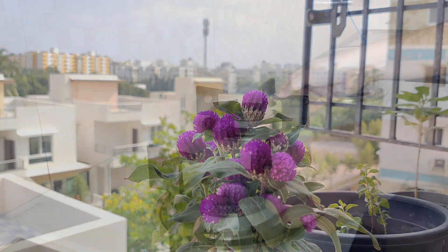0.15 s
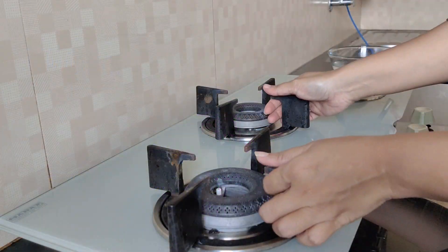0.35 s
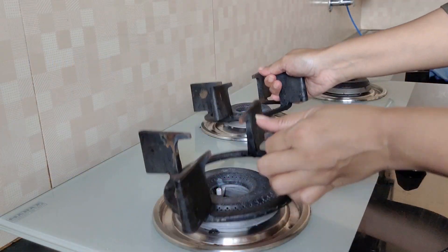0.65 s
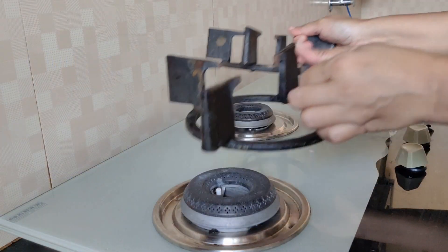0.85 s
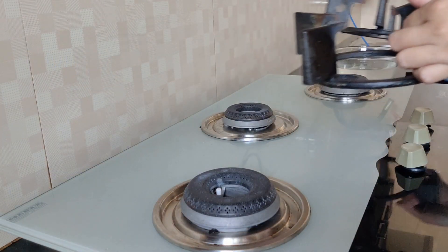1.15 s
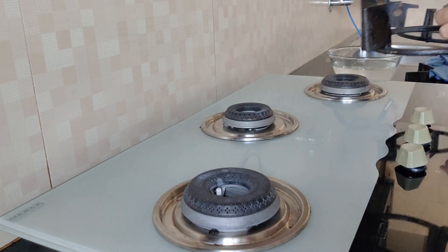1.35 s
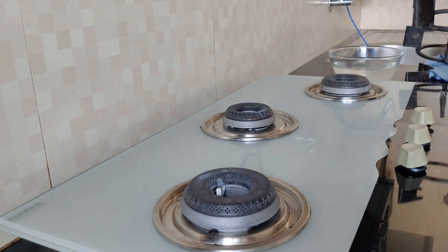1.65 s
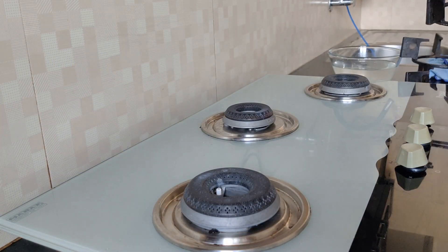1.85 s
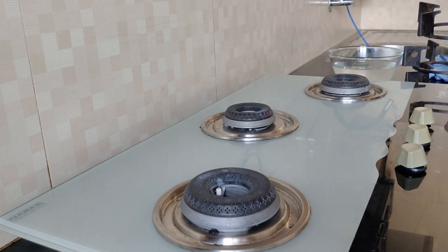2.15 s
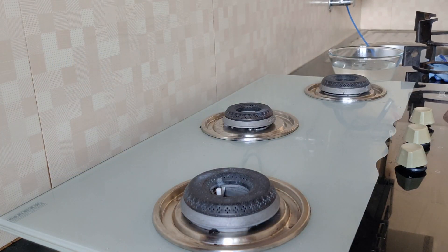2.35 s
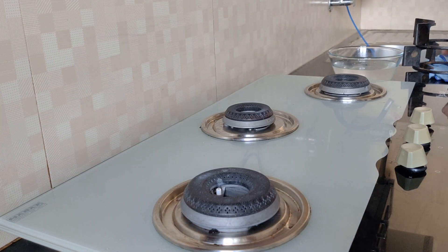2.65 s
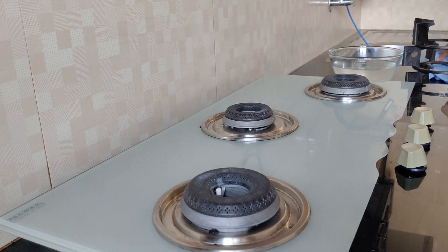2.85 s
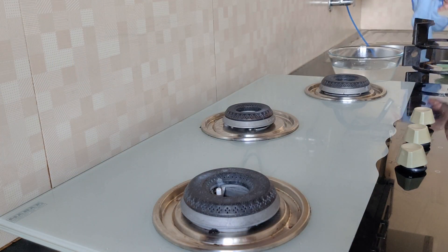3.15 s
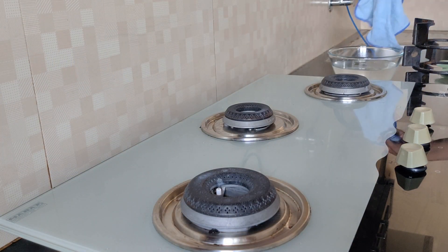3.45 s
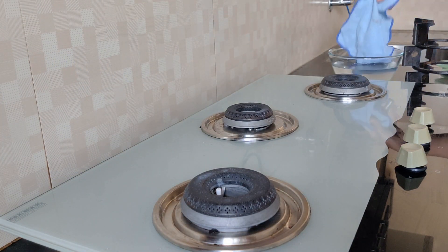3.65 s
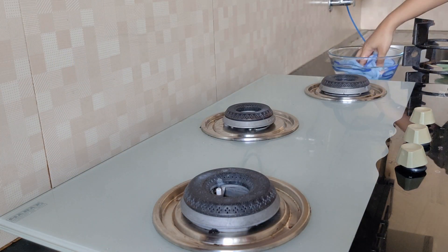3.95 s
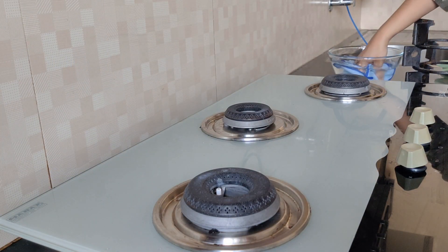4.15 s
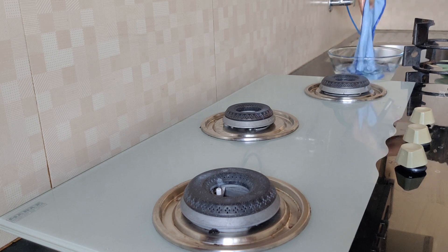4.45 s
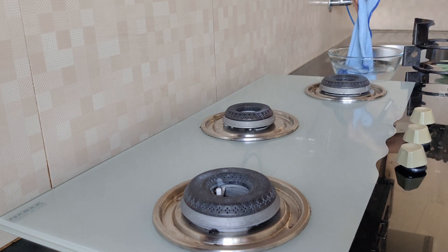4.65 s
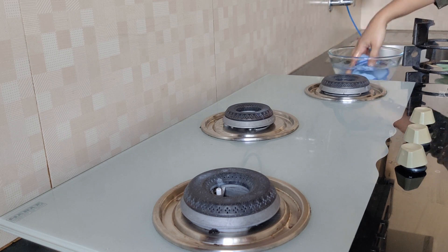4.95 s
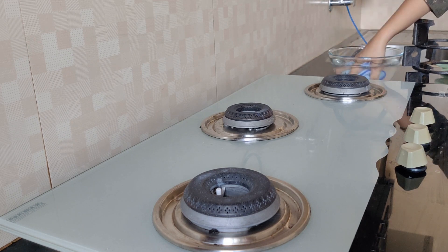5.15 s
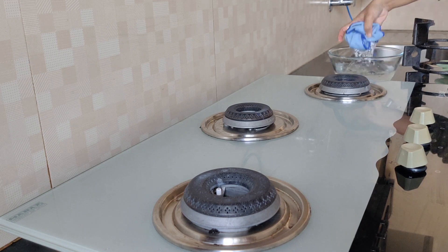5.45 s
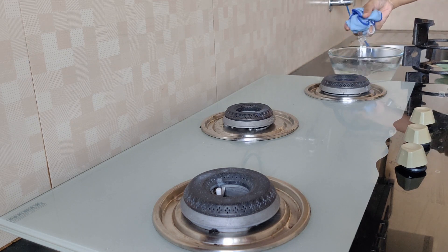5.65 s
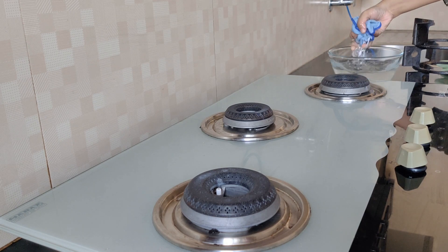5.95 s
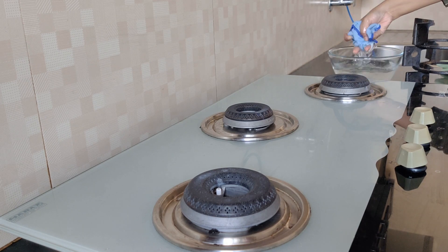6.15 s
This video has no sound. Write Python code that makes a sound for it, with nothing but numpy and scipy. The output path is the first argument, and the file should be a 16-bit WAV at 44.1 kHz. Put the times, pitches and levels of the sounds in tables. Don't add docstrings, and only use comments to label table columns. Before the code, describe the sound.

A kitchen with hard walls, heard in stereo from near the hob. First outdoor rumble, traffic hiss and a faint wavering brake whistle, ending at a dull iron knock. After near silence, two strong metallic clunks with rattle and ring as stands land on the counter. Then tiny clear drops, a soft cloth rustle, wet clicks and dripping, and finally a lively burst of gurgling bubbles and fizzing spray.

```python
import sys
import numpy as np
from scipy import signal
from scipy.fft import rfft, irfft, next_fast_len
from scipy.io import wavfile
from scipy.ndimage import uniform_filter1d, map_coordinates

SR = 44100
rng = np.random.default_rng(int(sys.argv[2]) if len(sys.argv) > 2 else 0)


def generate_wav(signal):
    frames = np.transpose(np.atleast_2d(signal))
    scaled = np.clip(frames, -1, 1) * 32767
    pcm = np.round(scaled).astype(np.int16)
    wavfile.write(sys.argv[1], SR, pcm)


def undo_db(level):
    steps = np.asarray(level, float) / 20
    return 10 ** steps


N = 277830

# t/s, peak level/dB
CONTACTS = [
    (0.781, -21.5),
    (2.267, -16),
    (2.8396, -15),
    (2.478, -31),
]
# f/Hz, correlation
ALIKE = [(42, .15), (70, .82), (130, .85), (290, .75), (640, .45), (1410, -.1), (3100, 0), (6000, .8),
         (15000, .85)]


def unit(x):
    return x / np.sqrt(np.mean(x ** 2) + 1e-20)


def along(points, hz):
    f, value = np.transpose(points)
    return np.interp(np.log(hz + 1), np.log(f + 1), value)


def curves(rows):
    s, *columns = np.transpose(rows)
    t = np.arange(N) / SR
    return [undo_db(np.interp(t, s, db, left=-200, right=-200)) for db in columns]


def wobble(rate):
    knots = rng.standard_normal(int(N * rate / SR) + 4)
    return map_coordinates(knots, [np.arange(N) * rate / SR])


def filtered(x, response):
    m = next_fast_len(x.shape[-1] + 8192)
    spectrum = rfft(x, m) * response(np.fft.rfftfreq(m, 1 / SR))
    return irfft(spectrum, m)[..., :x.shape[-1]]


def modes(peaks, skirt=1):
    def one(f, centre, width):
        damping = 1j * f * width
        return (damping / (centre * centre - f * f + damping)) ** skirt

    return lambda f: sum((-1) ** k * undo_db(db) * one(f, centre, width + 1)
                         for k, (centre, width, db) in enumerate(peaks))


def ports(pair, response, alike, lag=0):
    def mixing(hz):
        angle = np.arccos(np.clip(along(alike, hz), -1, 1)) / 2
        return response(hz) * [np.cos(angle), np.sin(angle)]

    mid, side = filtered(pair, mixing)
    return unit(np.array([np.roll(mid + side, lag), mid - side]))


def rush(spectrum, lumps_db, rate):
    pair = rng.standard_normal((2, N)) * undo_db(lumps_db * wobble(rate))
    return ports(pair, lambda hz: undo_db(along(spectrum, hz)), ALIKE)


def add(out, s, db, grain, t60, wet_db, alike, lag=5):
    t = np.arange(int(SR * np.clip(1.2 * t60, .05, .33))) / SR
    a, b = rng.standard_normal((2, len(t)))
    angle = np.arccos(np.clip(alike, -1, 1)) / 2
    tail = np.array([np.cos(angle) * a + np.sin(angle) * b, np.cos(angle) * a - np.sin(angle) * b])
    flutter_db = 1.42 * np.interp(t, np.arange(60) * 0.0056, rng.standard_normal(60))
    fall_db = 60 * (t / max(t60, .03)) ** 1.223
    tail *= undo_db(wet_db + flutter_db - fall_db) * np.clip(t / .004, 0, 1)
    tail[:, 0] = 1
    tail[0] = np.roll(tail[0], lag)
    heard = signal.fftconvolve(grain[None] / np.abs(grain).max(), tail, axes=1)
    i = round(s * SR)
    out[:, i:i + heard.shape[1]] += undo_db(db) * heard[:, :out.shape[1] - i]


def rocking(touches, t):
    # rise/s, fall while rocking/(dB/s), fall at rest/(dB/s)
    attack_s = np.array((0.013, 0.0023, 0.0067))[:, None]
    sag = np.array((33.5, 102.5, 157))[:, None]
    release = np.array((183, 193, 248.5))[:, None]
    crack_db = np.array((2, 2.5, 12))[:, None]
    crack_s = 0.024
    power = 0
    for s, *levels_db, hold in touches:
        age = np.clip(t - s, 0, None)
        fall_db = sag * np.minimum(age, hold) + release * np.clip(age - hold, 0, None)
        fall_db = fall_db - crack_db * np.exp(-age / crack_s)
        gain = undo_db(np.array(levels_db)[:, None] - fall_db) * np.clip(age / attack_s, 0, 1)
        power = power + gain ** 2
    return np.sqrt(power)


def stands():
    # t/s, thud/dB, clatter/dB, rattle/dB, rocking/s
    knocks = [
        [(0.748, -25.5, -43.5, -68, 0.011), (0.78, -26, -31.5, -47.5, 0.064)],
        [(1.802, -47, -47.5, -70.5, .04)],
        [(2.246, -49, -57, -55, .02), (2.267, -27.5, -28.5, -41, 0.14), (2.305, -32.5, -32, -37.5, 0.15),
         (2.477, -39.5, -44, -61, 0.024)],
        [(2.82, -45, -58, -65.5, .02), (2.84, -25.5, -27.5, -35, 0.18), (3.11, -54, -76, -87, 0.12)],
        [(4.21, -51.5, -56.5, -72, 0.072)],
    ]
    # f/Hz, width/Hz, level/dB
    thuds = [
        [(94.4, 9.2, -2), (167, 24, 2), (278.7, 30, -5.5), (361, 21, -11.5)],
        [(94, 12, -30), (283, 27, 1.5), (362, 43, -6)],
        [(101.4, 31, -1), (135.7, 24, -2), (162.4, 17, -8), (277.5, 34, -1), (355, 5.8, -2.5)],
        [(110.3, 39.5, 5.5), (148.8, 11, 0), (243, 63, -11.5), (287.3, 16, 5), (324, 22, -11)],
        [(98, 26, -13), (296, 390, 9)],
    ]
    # f/Hz, width/Hz, level/dB
    clatters = [
        [(481, 14, 10), (569, 120, 4), (732, 108, 2), (943, 19, -7.5), (1636, 97, -15)],
        [(560, 18, -4.5), (790, 43, -9), (914, 33, -6), (1070, 15, -19), (1710, 130, -18.5)],
        [(569, 24, -1), (655, 28, 4), (893, 77, -4.5), (1040, 6.2, -4.5), (1156, 91, -8.5), (1289, 29, -2.5),
         (1580, 25, -11)],
        [(520, 205, 0), (590, 48, -13), (662, 54, 7), (797, 21, 1.5), (905, 156, -1), (1166, 10, -3.5),
         (1640, 49, -9)],
        [(903, 200, -8), (1860, 70, -15)],
    ]
    # f/Hz, width/Hz, level/dB
    rattles = [
        [(2180, 950, 7), (2860, 730, -2.5), (4260, 790, -7), (6400, 2700, -13.5), (9800, 1800, -24),
         (12600, 3800, -22.5)],
        [(2220, 160, 0)],
        [(2020, 1370, 2), (3050, 2200, -5), (6700, 410, -18), (12000, 4300, -28.5)],
        [(2132, 74, 6.5), (3330, 800, -15.5), (6800, 2000, -27)],
        [(2120, 180, 0)],
    ]
    knock_pan = (0.5, -3.5, 0.2, 0.3, -1.5)
    # f/Hz, correlation
    knock_alike = [(25, .3), (60, .78), (130, .9), (300, .95), (700, .85), (1500, .75), (3000, .75),
                   (8000, .8)]
    # f/Hz, level/dB
    dull_band = [(4100, -0.5), (4700, -10), (5500, -6), (6000, 0.5)]
    # f/Hz, width/Hz, level/dB
    cracks = [
        [(1270, 520, 7), (2750, 680, 7.5), (3830, 910, -6), (4500, 620, -5), (6700, 1500, -8.5),
         (10000, 1300, -25), (13000, 3500, -28)],
        [(1100, 380, 13), (2600, 2100, -7), (4030, 640, -15), (7000, 2300, -28)],
        [(1100, 620, 1.5), (2360, 960, -11), (3880, 410, -19), (7060, 2000, -33)],
        [(700, 370, 4), (1300, 600, -6), (2600, 1000, -18)],
    ]

    out, size = np.zeros((2, N)), SR // 2
    for touches, pan_db, *bodies in zip(knocks, knock_pan, thuds, clatters, rattles):
        i = round(touches[0][0] * SR)
        on_counter = i > SR
        pan = undo_db([[pan_db / 2], [-pan_db / 2]])
        gains = rocking(touches, (i + np.arange(size)) / SR)
        for gain, body, bed_db in zip(gains, bodies, (-12, -9, -30)):
            chatter = rng.standard_normal((2, SR)) * undo_db(1.6 * rng.exponential(size=(2, SR)))
            wide = [(hz, hz * 0.5, bed_db + db) for hz, _, db in body]
            sound = ports(chatter, modes(body + wide, skirt=2.35), knock_alike, lag=8)[:, -size:]
            power = uniform_filter1d(np.mean(sound ** 2, 0), 1800)
            steady = np.sqrt(np.abs(power) + 0.11)
            dulled = filtered(sound, lambda hz: undo_db(along(dull_band, hz) * on_counter))
            out[:, i:i + size] += pan * gain * dulled / steady

    t = np.arange(300) / SR
    for (s, db), colour in zip(CONTACTS, cracks):
        burst = rng.standard_normal(len(t)) * undo_db(-60 * t / 0.011)
        crack = filtered(burst, modes(colour, skirt=2.06))
        add(out, s, db - 3, crack, t60=.17, wet_db=-29, alike=.6, lag=12)
    return out


def iron():
    # t/s, level/dB, weak high modes/dB
    strikes = [
        (0.033, -65, -62),
        (0.781, -45, -42),
        (2.268, -32.5, -35.5),
        (2.358, -29.5, -60),
        (2.84, -43.5, -21),
    ]
    # f/Hz, level/dB, t60/s
    irons = [
        [(4620, 2, .22), (5900, -3, .2), (7700, -4, .3), (9100, 0, .15)],
        [(2492, -7, .3), (2700, 3, .1), (2859, -4, .14), (3661, -8, .2), (4177, -10, .09), (4650, -14, .06),
         (6450, -20, .08), (7800, -24, .1)],
        [(2288, -6, .42), (2525, -8, .4), (2697, 0, .3), (2869, -8, .5), (3128, -7, .4), (3321, -9, .35),
         (3020, -10, .3), (5814, -26, .12), (6169, -19, .36), (7305, -18, .2), (8204, -27, .3), (8952, -23, .1),
         (10700, -48, .5)],
        [(2697, 0, .16), (2699, -8, .48)],
        [(2143, 5, .44), (2129, -1, .46), (2180, -6, .4), (3052, -12, .3), (3321, -12, .36), (2503, -14, .5),
         (2681, -6, .36), (2864, -11, .5), (3666, -16, .3), (3994, -13, .4), (5835, -15, .18), (6121, -15, .25),
         (6934, -14, .3), (7720, -16, .36), (8877, -19, .2), (9539, -18, .16)],
    ]
    out, t = np.zeros((2, N)), np.arange(SR // 2) / SR
    late_s = np.array([[5 / SR], [0]])
    for (s, db, crowd_db), partials in zip(strikes, irons):
        crowd = [(5700 + 4600 * a, crowd_db + 6 * b, 0.049 + 0.35 * c ** 3)
                 for a, b, c in rng.random((26, 3)) if crowd_db > -50]
        for hz, level_db, t60 in partials + crowd:
            knots = np.meshgrid(np.arange(4), t * 58, indexing="ij")
            waver = map_coordinates(rng.standard_normal((4, 30)), knots)
            height = (hz / 5500) ** 2
            tone = np.sin(2 * np.pi * hz * (t - late_s) + (.3 + height) * waver[2:])
            swell_db = db + level_db + (1.5 + 1.1 * height) * waver[:2] - 60 * (t / t60) ** 1.5
            swell = undo_db(swell_db) * (1 - np.exp(-t / .003))
            out[:, round(s * SR):][:, :len(t)] += swell * tone
    return out * undo_db([[1.5], [-1.5]])


def counter():
    # t/s, f/Hz, level/dB, t60/s
    slab_notes = [
        (0.784, 172.1, -35.5, 0.3),
        (0.784, 340, -29.5, 0.13),
        (2.295, 278.4, -27, .25),
        (2.272, 709, -30, 0.15),
        (2.272, 1040, -32.5, 0.1),
        (2.272, 358, -40.5, 0.22),
        (2.845, 286, -30, 0.48),
        (2.845, 602, -42, 0.23),
        (3.106, 147, -47, 0.45),
    ]
    out, t = np.zeros((2, N)), np.arange(SR // 2) / SR
    for s, hz, db, t60 in slab_notes:
        knots = np.meshgrid(np.arange(3), t * 45, indexing="ij")
        waver = map_coordinates(rng.standard_normal((3, 30)), knots)
        swell = undo_db(db + 2.8 * waver[0] - 60 * (t / t60) ** 2) * (1 - np.exp(-t / 0.0047))
        out[:, round(s * SR):][:, :len(t)] += swell * np.sin(2 * np.pi * hz * t + 0.32 * waver[1:])
    return out


def bubble(hz, turns):
    age = np.arange(int(turns * SR / hz)) * hz / SR / turns
    phase = 2 * np.pi * turns * (.95 * age + .06 * age ** 2)
    return np.sin(phase) * np.sin(np.pi * age ** .8) ** 2


def bubbles():
    # t/s, peak level/dB, f/Hz, echo t60/s
    plops = [(5.689, -52.5, 910, 0.31), (5.883, -43, 1100, 0.12), (5.888, -30, 1025, 0.21),
             (5.893, -38.5, 806, 0.22), (5.936, -35, 1014, 0.12), (5.932, -40.5, 725, 0.23),
             (5.969, -44.5, 990, 0.25), (6.04, -40, 784, .1), (6.0515, -23, 672, 0.13),
             (6.057, -29.5, 1036, 0.12), (6.072, -42, 1150, 0.13), (6.078, -38, 680, 0.32),
             (6.088, -35, 693, 0.13), (6.104, -39, 655, 0.18), (6.112, -45, 1060, .25),
             (6.128, -37.5, 694, .2), (6.142, -35, 623, 0.16), (6.158, -46, 680, 0.11),
             (6.143, -38.5, 950, 0.3), (6.19, -43, 850, .3), (6.218, -42.5, 1030, 0.26),
             (6.235, -45.5, 590, 0.27), (6.27, -48.5, 840, 0.28), (6.14, -46, 473, .2), (6.2, -50, 442, .3),
             (6.245, -49.5, 418, .3)]
    # t/s, peak level/dB, f/Hz, echo t60/s
    blips = [(3.3558, -60, 1900, 0.43), (4.361, -56.5, 1640, 0.31), (4.5456, -50, 1860, 0.16),
             (4.6982, -52.5, 1730, 0.34), (5.0684, -32, 1720, 0.22), (5.178, -50, 1830, 0.26),
             (5.597, -54.5, 1660, 0.4), (5.614, -52.5, 1450, 0.34), (5.7664, -43.5, 1814, 0.23),
             (6.096, -55, 1750, 0.11), (6.1398, -44.5, 1690, 0.1), (6.2, -54, 1700, 0.18)]
    # t/s, peak level/dB, f/Hz, echo t60/s
    pings = [(4.5455, -48.5, 2500, 0.22), (4.6453, -53.5, 2550, 0.63), (4.7026, -36, 2490, 0.24),
             (4.708, -46, 3080, 0.28), (4.803, -48, 2410, 0.21), (4.897, -57, 2380, 0.21),
             (5.024, -44, 3050, 0.14), (5.106, -51, 2330, 0.091), (5.1362, -48.5, 3060, 0.16),
             (5.1809, -46, 2500, .14), (5.749, -48, 2330, .25), (5.884, -46, 2620, 0.09),
             (5.893, -46, 3000, 0.19), (5.912, -58, 2280, 0.09), (5.92, -42, 3050, 0.24),
             (6.176, -59, 2330, 0.065), (6.195, -54, 2230, .1), (6.195, -45, 3100, 0.23),
             (6.2184, -43, 2790, .2), (6.247, -44, 2830, .2)]
    # t/s, peak level/dB, f/Hz, echo t60/s
    tinks = [(4.2821, -50, 3900, .2), (4.33, -43, 4900, 0.12), (4.349, -42, 3880, .2),
             (4.357, -50, 3370, .15), (4.355, -43, 4650, 0.17), (4.383, -48, 5070, 0.15),
             (4.406, -62, 3760, 0.091), (4.7523, -45.5, 3830, 0.16), (5.03, -52, 4500, .12),
             (5.059, -45.5, 4020, 0.11), (5.755, -52, 3290, .3), (5.99, -47, 3830, .15),
             (6.0523, -41, 3900, .15), (6.0842, -39, 5900, 0.17), (6.087, -42, 3800, 0.089),
             (6.1042, -37, 4420, .25), (6.127, -42, 4500, 0.19)]
    # t/s, peak level/dB, f/Hz, echo t60/s
    grips = [
        (.55, -53, 690, 0.079),
        (.575, -51.5, 1140, 0.21),
        (.61, -53, 1090, 0.18),
        (.715, -57, 1080, 0.11),
        (.722, -62, 2680, 0.15),
        (.755, -49, 1860, 0.12),
        (.756, -65, 5750, 0.089),
    ]
    # start t/s, length/s, level/dB, lowest f/Hz, drops
    swarms = [
        (4.29, .14, -58, 3000, 30),
        (4.5, .75, -63, 2600, 60),
        (5.88, .41, -53, 2000, 130),
    ]

    out = np.zeros((2, N))
    for table, turns in ((plops, 9), (blips, 12), (pings, 18), (tinks, 22), (grips, 16)):
        for s, db, hz, t60 in table:
            start = s - 0.2526 * turns / hz
            add(out, start, db, bubble(hz, turns), t60, wet_db=-26.5, alike=0.24)
    for start, length, db, low_hz, count in swarms:
        for when, pitch, size, life in rng.random((int(count), 4)):
            grain = bubble(low_hz * 3.5 ** pitch, 2 + 8 * life)
            level_db = db + 12 * size ** 2 + 3 * when
            add(out, start + length * when, level_db, grain, t60=.05, wet_db=-30, alike=.4)
    return out


def echo_s(db):
    return 0.3 * undo_db(-0.14 * (db + 40))


def ticks():
    # t/s, peak level/dB, f/Hz
    tap_drops = [
        (0.03, -46.5, 10800),
        (0.25, -45, 7100),
        (0.419, -39.5, 12500),
        (0.5997, -53, 9000),
        (1.2706, -46, 7160),
        (1.442, -41, 12000),
        (2.148, -42.5, 7150),
        (3.449, -42.5, 7200),
        (3.5993, -41, 7500),
        (4.124, -43.5, 7250),
    ]
    # t/s, peak level/dB, f/Hz, broad part/dB, echo t60/s
    snaps = [(3.94, -56, 10500, 1, 0.34), (4.048, -56, 11800, -7, .15), (4.28, -36.5, 10700, 10, 0.36),
             (4.325, -38, 10800, 9, 0.27), (4.369, -38.5, 10000, 10, 0.16), (4.5077, -36.5, 9800, 10, 0.27),
             (4.526, -39, 7430, 3, 0.19), (4.672, -48, 7270, -10, 0.2), (4.7053, -42, 6600, -5, 0.12),
             (4.71, -38, 10300, 10, 0.14), (4.775, -50, 14000, 0, 0.24), (4.821, -46, 5560, -2, 0.088),
             (4.899, -62, 6300, -18, 0.73), (4.916, -41, 6700, 0, 0.18), (4.917, -44, 11600, 0, 0.079),
             (5.0075, -41.5, 5900, -1, 0.38), (5.06, -38.5, 13800, 0, 0.25), (5.08, -39, 12000, 3, 0.16),
             (5.191, -52, 11600, -10, 0.23), (5.21, -46.5, 10900, 11, 0.055),
             (5.3322, -46.5, 11200, -20, 0.16), (5.333, -48, 13600, -47, .14),
             (5.678, -43, 10570, -30, 0.17), (5.598, -56, 11000, -7, .1), (5.77, -50, 10500, -14, .1),
             (5.796, -44, 7200, 12, 0.36), (5.857, -42, 10300, 3, 0.17), (5.886, -51, 9000, 6, .25),
             (5.952, -49, 7400, -2, 0.29), (6.053, -27, 14200, -9, 0.095), (6.105, -32.5, 10900, 6, 0.26),
             (6.126, -40, 8340, -20, 0.14), (6.135, -40, 5670, -11, 0.12), (6.243, -36, 11100, -8, 0.091)]
    # f/Hz, level/dB
    snap_colour = [(4000, -68), (5500, 2), (6400, 2), (7300, 9.5), (8700, 0), (9800, 7), (12300, 3),
                   (14500, 6), (15700, -13)]

    out, click = np.zeros((2, N)), signal.unit_impulse(320, 88)
    bright = unit(filtered(click, lambda f: undo_db(along(snap_colour, f))))
    low = unit(filtered(click, modes([(3700, 4100, 0)], skirt=3.1)))
    add(out, 0.029, -42, bright, t60=.1, wet_db=-29, alike=.7, lag=0)

    drops = [(s, db, hz, 8, echo_s(db), -4.5) for s, db, hz in tap_drops]
    drops += [(s, db, hz, broad_db, t60, -6 + 0.49 * broad_db) for s, db, hz, broad_db, t60 in snaps]
    for s, db, hz, broad_db, t60, low_db in drops:
        ring = unit(filtered(click, modes([(hz, .13 * hz, 0)], skirt=2)))
        grain = undo_db(broad_db) * bright + .7 * ring + undo_db(low_db) * low
        uneven_db = 1.3 * rng.standard_normal(45)
        grain = filtered(grain, lambda f: undo_db(np.interp(f, np.arange(45) * 500, uneven_db)))
        add(out, s - .002, db - 2.16, grain, t60, wet_db=-18.5, alike=0.88 - 0.3 * (s > 6), lag=0)
    return out


def spray():
    # t/s, fizz level/dB
    fizz_levels = [
        [(1.7, -79), (1.8, -74), (2.0, -69.5), (2.26, -63.5)],
        [(3.2, -80), (3.4, -67.5), (3.62, -79)],
        [(3.8, -80), (3.94, -71.5), (4.79, -68), (5.3, -72.5)],
        [(5.3, -81.5), (5.6, -74), (5.87, -63), (5.89, -50.5), (6.04, -58.5), (6.07, -50.5), (6.3, -52)],
    ]
    # f/Hz, level/dB
    fizz_colour = [(710, -67), (1200, -1), (1520, 0.5), (1660, -2), (1990, 2), (2840, 2.5), (3450, 1),
                   (4190, -3.5), (10700, -5), (15800, -6)]
    fizz_alike = [(2000, 0.035), (8000, 0.37), (13000, 0.84)]  # f/Hz, correlation
    gain = sum(curves(rows)[0] for rows in fizz_levels)
    clumps_db = 2.4 * wobble(30) + 0.75 * wobble(250)
    grains = rng.standard_normal((2, N)) * undo_db(2.53 * rng.exponential(size=N) + clumps_db)
    return gain * ports(grains, lambda hz: undo_db(along(fizz_colour, hz)), fizz_alike)


def squeal():
    # t/s, f/Hz, level/dB
    brake = [
        (0, 2790, -62),
        (.11, 2743, -70),
        (.17, 2720, -79.5),
        (.22, 2900, -65),
        (.35, 2930, -67),
        (.41, 2800, -81),
        (.5, 2680, -92),
    ]
    s, hz, db = np.transpose(brake)
    pitch = np.interp(np.arange(N) / SR, s, hz) + 50 * wobble(120.7)
    gain, = curves(np.transpose([s, db]))
    uneven = undo_db(6.0 * np.array([wobble(41.0), wobble(50.4)]))
    return gain * uneven * np.sin(2 * np.pi * np.cumsum(pitch) / SR)


def street():
    # t/s, rumble level/dB, traffic hiss level/dB
    passing = [
        (0.0, -40, -53.5),
        (0.314, -47, -53.5),
        (0.54, -41, -52),
        (0.72, -36.5, -53),
               (0.848, -98, -45.5),
    ]
    # f/Hz, level/dB
    rumble_colour = [(15, -46), (25, -3), (60, 2.5), (168, -5), (199, -5), (296, -14), (400, -44),
                     (520, -59), (880, -120)]
    # f/Hz, level/dB
    traffic_colour = [(180, -48), (300, 5), (416, -1), (554, 5), (613, -4.5), (818, -4), (927, -6),
                      (1440, -11.5), (2860, -14.5), (3370, -25), (6000, -36), (7800, -75), (13200, -120)]
    # f/Hz, width/Hz, level/dB
    whines = [(547, 21, 10.5)]
    rumble, traffic = curves(passing)
    motor = ports(rng.standard_normal((2, N)), modes(whines, skirt=2), ALIKE)
    motor = undo_db(-8 + 4 * wobble(14)) * motor
    hiss = rush(traffic_colour, lumps_db=2, rate=18) + motor
    return rumble * rush(rumble_colour, lumps_db=3, rate=14) + traffic * hiss


def kitchen_air():
    # f/Hz, level/dB
    still_colour = [(13, -112), (22, 0.5), (53, -8), (103, 4), (125, -13.5), (160, -6.5), (248, -16.5),
                    (284, -7), (364, -12), (407, -14.5), (725, -18.5), (1700, -30.5), (2950, -29),
                    (5110, -47.5), (15800, -44.5)]
    # f/Hz, width/Hz, level/dB
    hum_modes = [(98.7, 12.7, -1), (157.7, 40, -3.5), (244.8, 15.6, -3), (347.2, 48, -9.5),
                 (725, 12.4, -10.5)]
    # t/s, level/dB
    air_level = [
        (0.0, -50),
        (0.79, -46.5),
        (0.95, -53),
        (3.68, -53.5),
        (4.21, -51.5),
        (6.3, -50.5),
    ]
    hum = ports(rng.standard_normal((2, N)), modes(hum_modes, skirt=1.88), ALIKE)
    still = rush(still_colour, lumps_db=1.0, rate=9.4) + undo_db(-2.0) * hum
    t = np.arange(N) / SR
    stirred_db = sum(np.exp(-((t - s - .1) / 0.13) ** 2) for s, _ in CONTACTS)
    return curves(air_level)[0] * undo_db(stirred_db - 4.5) * still


def scene():
    knocked = stands() + iron() + counter()
    water = bubbles() + ticks() + spray()
    return knocked + water + squeal() + street() + kitchen_air()


def low_pass(x):
    return signal.sosfilt(signal.butter(12, 16500, fs=SR, output="sos"), x)


def record(dry):
    # f/Hz, level/dB
    treble_dip = [(7600, 0.5), (8250, -2.5), (8900, 0.5)]
    top_hz = 15700
    mix = filtered(dry, lambda hz: (hz < top_hz) * undo_db(along(treble_dip, hz)))
    return low_pass(mix)


dry = scene()
out = record(dry)
generate_wav(out)
```